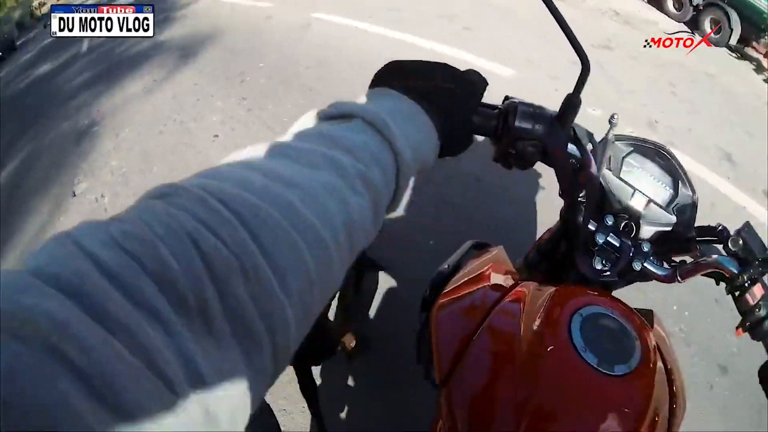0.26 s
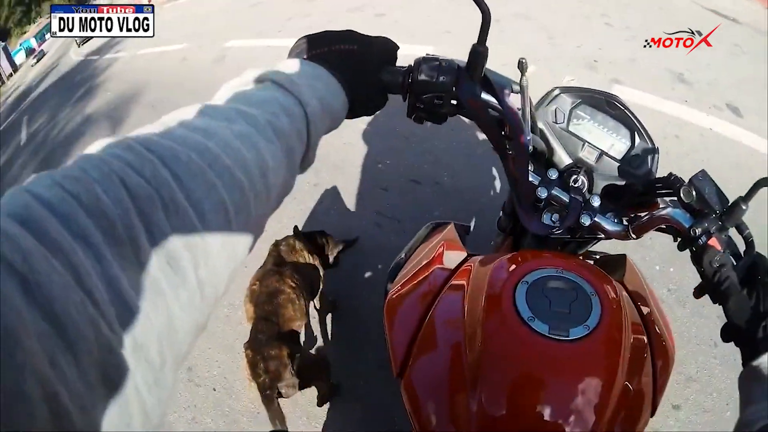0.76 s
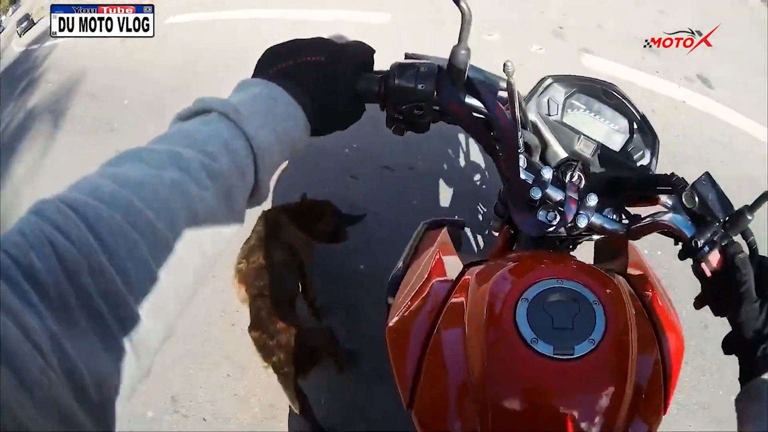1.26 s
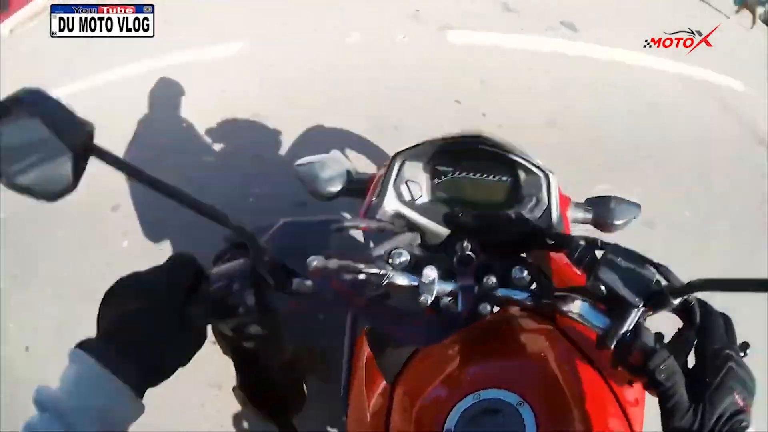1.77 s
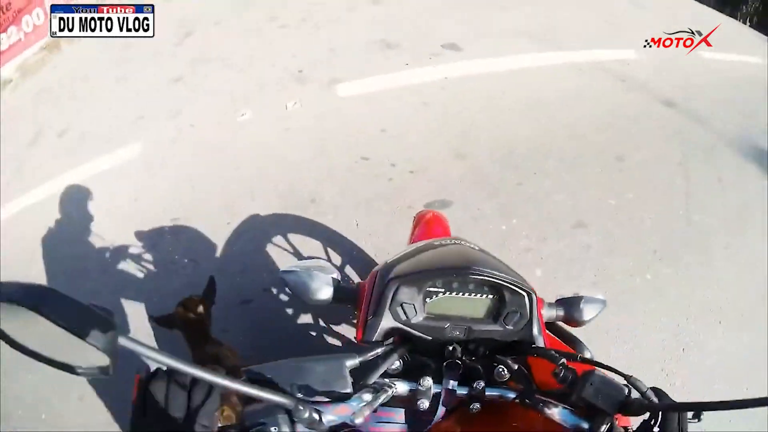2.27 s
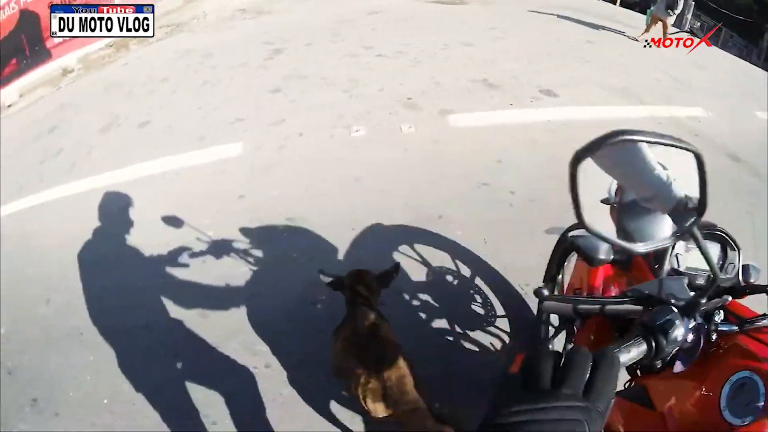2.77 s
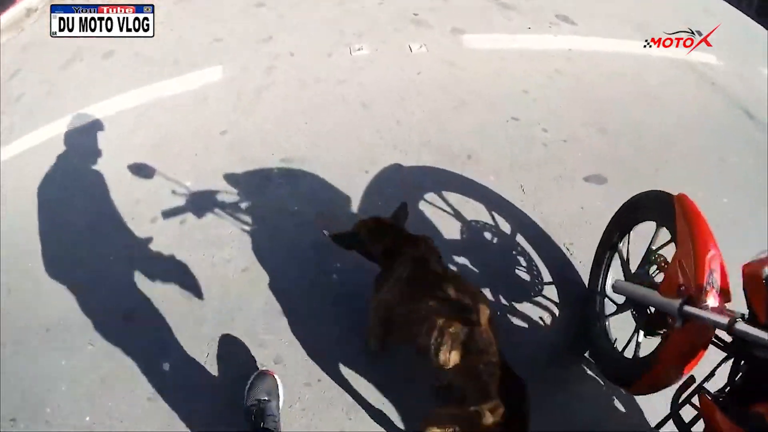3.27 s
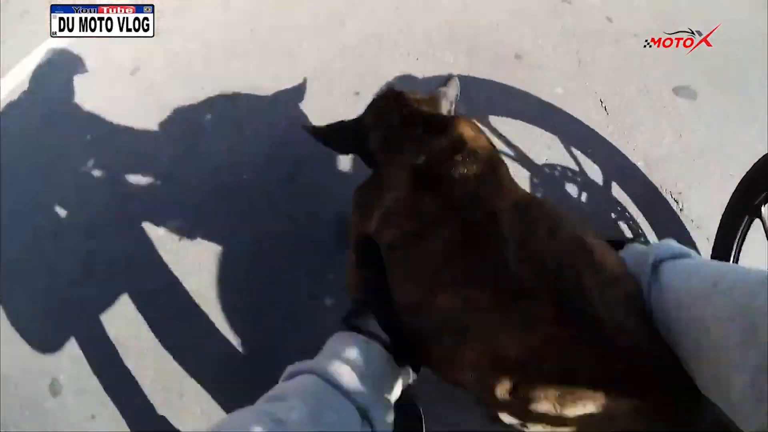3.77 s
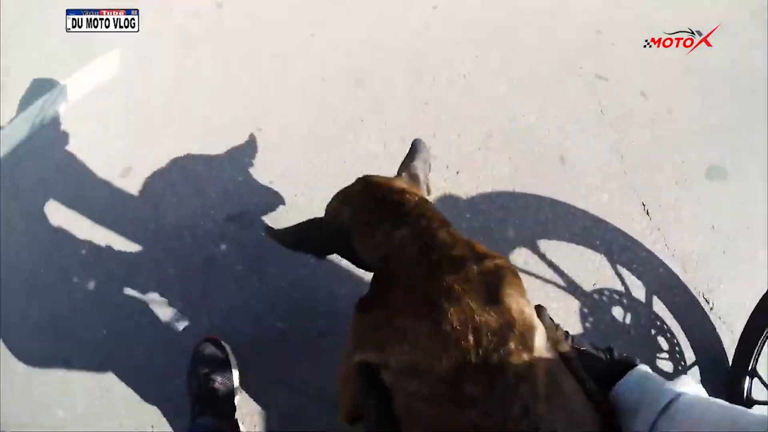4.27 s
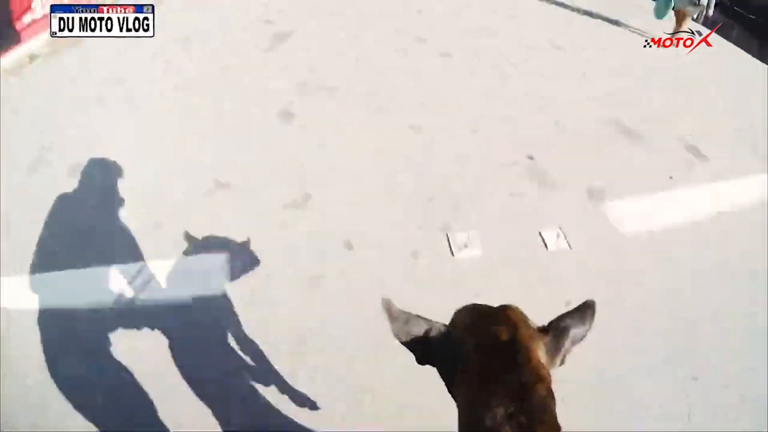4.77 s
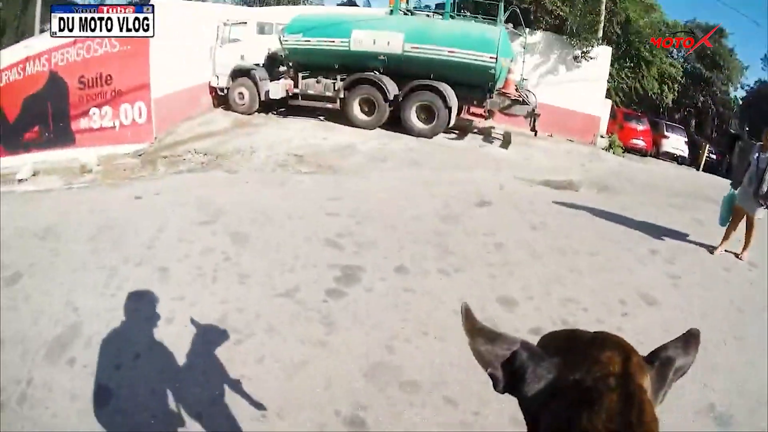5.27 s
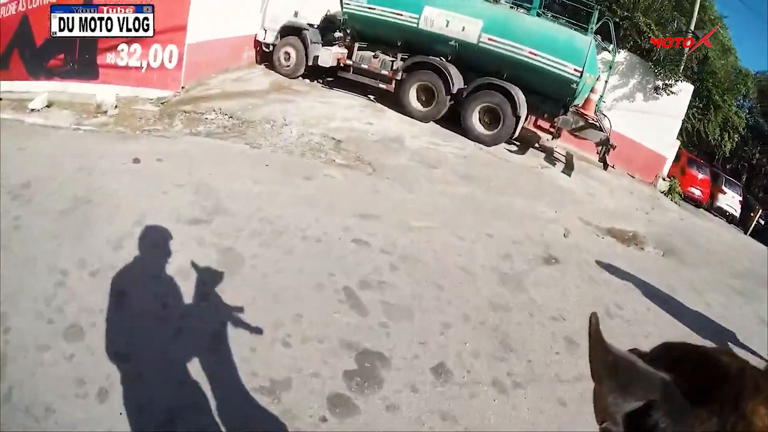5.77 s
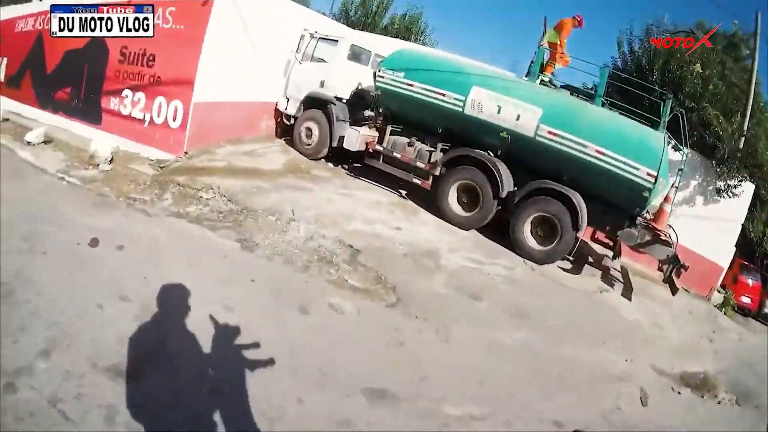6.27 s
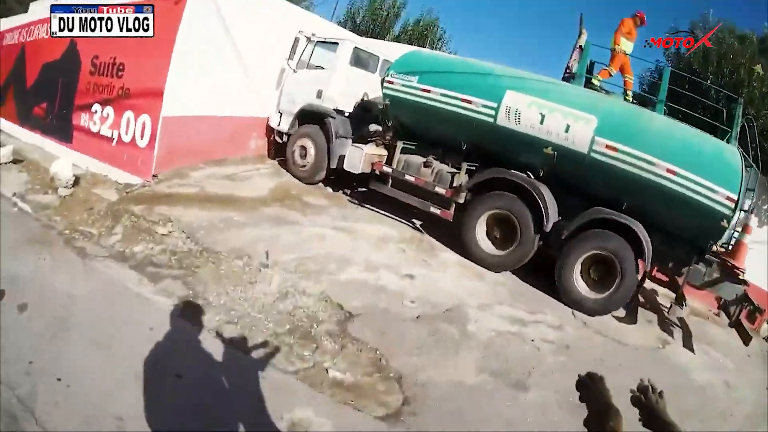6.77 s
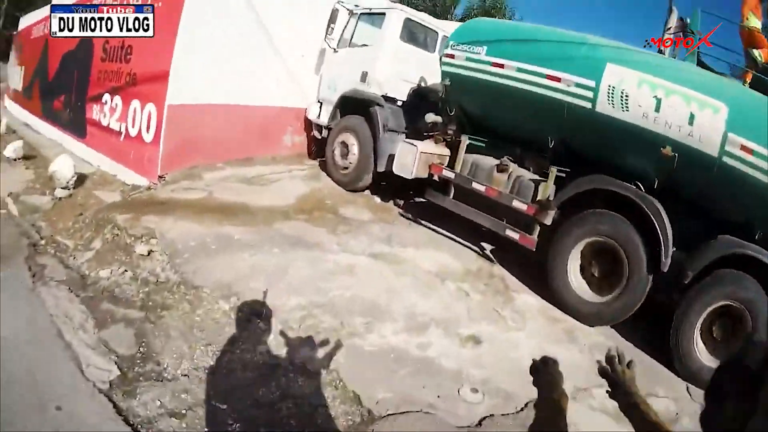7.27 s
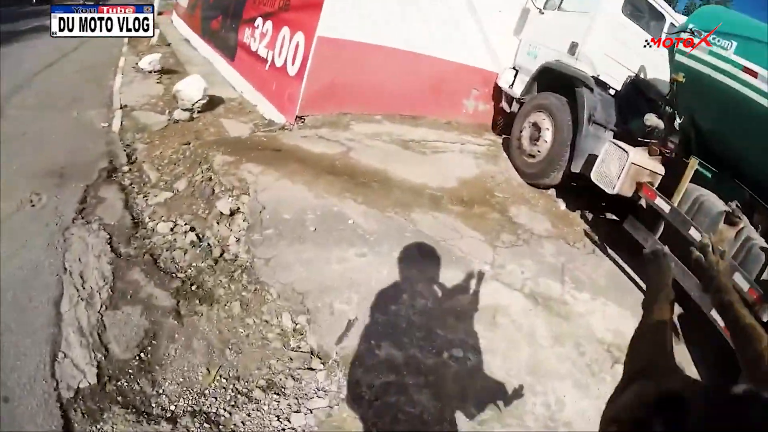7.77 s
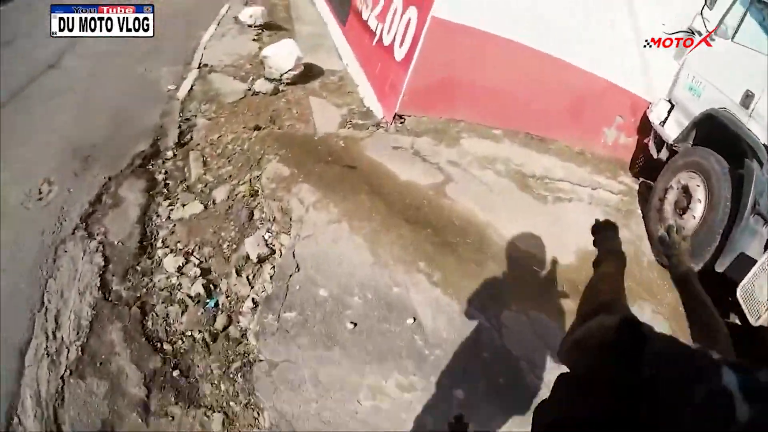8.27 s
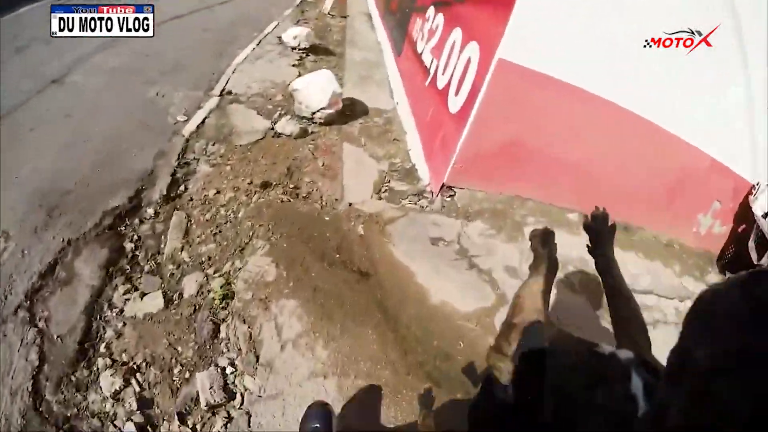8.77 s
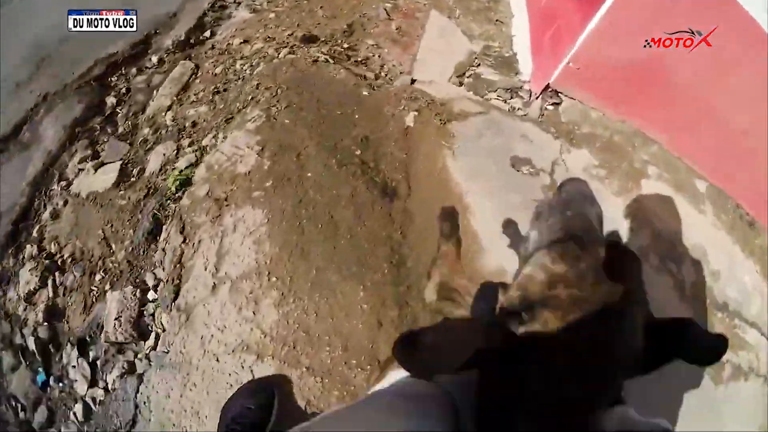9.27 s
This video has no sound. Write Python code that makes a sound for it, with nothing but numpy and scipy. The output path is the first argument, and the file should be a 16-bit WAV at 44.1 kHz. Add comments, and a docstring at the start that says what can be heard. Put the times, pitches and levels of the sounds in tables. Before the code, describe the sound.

A camera in a closed plastic case on a helmet, beside a sunny road. Dull, boxy street noise and thin hiss fade slowly; a brief horn toot echoes early, keys clink, and a scuff passes. Dry plastic ticks and light rustle follow as the rider lifts a dog. From about six seconds, carrying it brings hard thuds, crunching rattle and clipped low jolts, then sparse clicks over a subdued background.

```python
"""Helmet camera beside a road

A camera in a closed plastic case rides on a helmet. The case ticks in its mount and thuds, as damped modes
and noise bursts; steps and bumps jolt it as decaying swings and shake the helmet's resonances. Street noise
and hiss are shaped noise, with a brief scuff and a soft rustle; thin whistles are wavering sines, a horn
toots once in overtones with echoes, and keys clink as noise bursts. Hard jolts make the background sink
and overload the input."""
import sys
import numpy as np
from scipy import signal
from scipy.fft import rfft, irfft, next_fast_len
from scipy.io import wavfile
from scipy.ndimage import uniform_filter1d, map_coordinates

SR = 44100
rng = np.random.default_rng(int(sys.argv[2]) if len(sys.argv) > 2 else 0)


def bounce(signal):
    """Save signal as a 16-bit WAV file at the path given by the first command-line argument."""
    frames = np.transpose(np.atleast_2d(signal))
    limited = np.clip(frames, -1, 1)
    pcm = np.round(limited * 32767).astype(np.int16)
    wavfile.write(sys.argv[1], SR, pcm)


N = 419832


def amp(db):
    """Decibel law: the amplitude ratio of a level in dB."""
    return 10 ** (np.asarray(db) / 20)


def unit(x):
    """Normalisation: x scaled to an rms of 1."""
    return x / np.sqrt(np.mean(x ** 2) + 1e-20)


def along(points, hz):
    """Spectral envelope: (Hz, value) points joined on a logarithmic frequency axis."""
    f, v = np.transpose(points)
    return np.interp(np.log(hz + 1), np.log(f + 1), v)


def wobble(rate):
    """Slow random modulation: a smooth curve through random knots, rate of them a second."""
    knots = rng.standard_normal(int(N * rate / SR) + 4)
    return map_coordinates(knots, [np.arange(N) * rate / SR])


def filtered(x, response):
    """Linear filtering: the spectrum of x times a complex response of frequency."""
    m = next_fast_len(N + SR // 2)
    return irfft(rfft(x, m) * response(np.fft.rfftfreq(m, 1 / SR)), m)[..., :N]


def noise(spectrum, patchy_db=0):
    """Coloured noise: random patches of gain in time and frequency, then a spectral envelope, at rms 1."""
    z = signal.stft(rng.standard_normal(N), nperseg=512)[2]
    field = uniform_filter1d(rng.standard_normal(z.shape), 5, 0)
    field = uniform_filter1d(field, 12, 1)
    x = signal.istft(z * amp(patchy_db * unit(field)), nperseg=512)[1][:N]
    return unit(filtered(x, lambda hz: amp(along(spectrum, hz))))


def bursts(times, dbs, t60, spectrum):
    """Exponential decay: coloured noise jumps up at each time and falls 60 dB in t60 seconds."""
    envelope = np.zeros(N)
    np.add.at(envelope, np.round(times * SR).astype(int), amp(dbs))
    envelope = signal.lfilter([1], [1, -amp(-60 / (t60 * SR))], envelope)
    gain = lambda hz: amp(along(spectrum, hz))
    level_gain = lambda hz: gain(hz) / np.sqrt(np.mean(gain(hz) ** 2))
    return filtered(envelope * rng.standard_normal(N), level_gain)


def peak_db(s, db, rise_s, fall_s, t):
    """Exponential rise and decay: a level climbs 20 dB in rise_s to its peak and drops 20 dB in fall_s."""
    return db - 20 * np.where(t < s, (s - t) / rise_s, (t - s) / fall_s)


# Spectrum of the street noise inside the case. Each row: frequency in Hz, relative density in dB per Hz.
STREET_SPECTRUM = [(200, -27), (260, -5), (450, -5), (800, -6.5), (1150, -3.5), (1350, 3), (1520, -8),
                   (1750, -11), (2200, -12.5), (2400, -6), (2650, -12.5), (3200, -17.5), (3720, -12.5),
                   (4500, -22.5), (7000, -61.5)]
# Spectrum of the input hiss. Each row: frequency in Hz, relative density in dB per Hz.
HISS_SPECTRUM = [(3000, -20), (4700, 0), (7500, -3), (12000, 1), (15400, -1)]
# Thin whistles. Each row: start in seconds, end in seconds, mean frequency in Hz,
# mean amplitude in dB against the hiss rms.
WHISTLES = [(0, .55, 11750, -9), (4.05, 4.55, 13400, -9), (5.55, 5.95, 13400, -4), (0, 9.52, 12230, -13)]
# Swells of the background: a high start that falls away, a brief scuff, a soft rustle.
# Each row: peak time in seconds, rise in seconds, fall in seconds, street gain in dB, hiss gain in dB.
SWELLS = [(0, .1, 7.6, 3, 2), (1.928, 0.015, 0.11, 8, 1), (3.7, 0.18, 0.43, 4, 4)]
STREET_DB, HISS_DB = -48.5, -58.5  # rms levels at ease
HISS_TOP_HZ = 15350
# a jolt's level above SINK_FROM_DB, times SINK_PER_DB, is the drop of the street in dB
SINK_FROM_DB, SINK_PER_DB, SINK_BACK_DB_PER_S = -24, 0.4, 19
HISS_SINKS = 1.3  # drop of the hiss over drop of the street


def background():
    """Amplitude modulation: street noise and hiss swell, and sink after jolts; whistles waver."""
    t = np.arange(N) / SR
    sinks_db = []
    for s, db, *_ in JOLTS:
        drop_db = SINK_PER_DB * (db - SINK_FROM_DB) - SINK_BACK_DB_PER_S * (t - s)
        sinks_db.append(np.clip(drop_db, 0, None) * (t > s))
    sink_db = np.max(sinks_db, axis=0)
    street_db = STREET_DB - sink_db
    hiss_db = HISS_DB - HISS_SINKS * sink_db
    for s, rise_s, fall_s, street_up_db, hiss_up_db in SWELLS:
        hump = np.interp(t, [s - rise_s, s, s + fall_s], [0, 1, 0])
        street_db = street_db + street_up_db * hump
        hiss_db = hiss_db + hiss_up_db * hump
    street = amp(street_db + 1.25 * wobble(1.404)) * noise(STREET_SPECTRUM, patchy_db=1.6)
    hiss = filtered(noise(HISS_SPECTRUM, patchy_db=.5), lambda hz: hz < HISS_TOP_HZ)
    for start, end, hz, db in WHISTLES:
        fade = np.clip(np.minimum(t - start, end - t) / .15, 0, 1)
        level = amp(db + 3 * wobble(30))
        phase = 2 * np.pi * np.cumsum(hz + 25 * wobble(90)) / SR
        hiss += fade * level * np.sin(phase)
    return street + amp(hiss_db) * hiss


# Steps and head moves. Each row: peak time in seconds, sway level in dB, shell level in dB,
# time to fade 20 dB in seconds before the sway and shell shares scale it.
MOVES = [(1.1, -39, -42, .5), (2.762, -32.5, -50, 0.5), (3.39, -43, -43, 3), (3.54, -39, -31, 0.37),
         (3.93, -29.5, -30, 0.6), (4.1, -37, -42, 1), (4.67, -38, -40, 0.5), (5.37, -35.5, -34.5, 1),
         (5.747, -31.5, -22.5, 0.13), (5.97, -45, -36.5, 0.8), (6.06, -31, -26, 0.22),
         (6.11, -16.5, -13, 0.19), (6.332, -23, -9, 0.13), (6.418, -11, -6, 0.12), (6.5, -23, -40, 0.16),
         (6.58, -26, -27, 0.34), (6.649, -16.5, -10.5, 0.17), (6.698, -15, -7, 0.03),
         (6.871, -34, -16, 0.2576), (6.957, -16.5, -11.5, 0.15), (7.17, -36, -29.5, 0.7),
         (7.231, -10.5, -5.5, 0.1242), (7.39, -45, -36.5, 0.5), (7.541, -24, -13, 0.2346),
         (7.598, -37, -28, 0.14), (7.87, -37, -38, 1), (8.186, -27.5, -31, 0.44), (8.635, -26, -20.5, 0.29),
         (9.03, -30, -30.5, 0.3262), (9.45, -39.5, -41.5, 2)]
RISE_SHARE = 0.47  # rise time over fade time
SWAY_SHARE, SHELL_SHARE = 0.84, 0.61  # factors on the fade time
SWAY_DB, SHELL_DB = -49.5, -47.5  # rms levels on a still head


def effort_db(rest_db, peaks_db, share):
    """Maximum principle: the strongest move at each moment sets the level, never below the level at rest."""
    t = np.arange(0, N / SR, .002)
    levels = [peak_db(s, db, RISE_SHARE * share * fade_s, share * fade_s, t)
              for (s, *_, fade_s), db in zip(MOVES, peaks_db)]
    strongest = np.maximum(np.max(levels, axis=0), rest_db)
    return np.interp(np.arange(N) / SR, t, strongest)


# Spectrum of the slow sway. Each row: frequency in Hz, relative density in dB per Hz.
SWAY_SPECTRUM = [(12, -34), (25, 3.5), (42, -3), (75, -3.5), (100, -22), (140, -120)]
# Low resonances of the helmet. Each row: centre in Hz, width in Hz, relative gain in dB.
HELMET_MODES = [(98.5, 19.3, 2), (122, 71.8, -3.5), (215.7, 16.8, -1.5), (238, 22, -4)]
# Spectrum of the crunch, and of the grit of ticks. Each row: frequency in Hz, relative density in dB per Hz.
GRIT_SPECTRUM = [(250, -20), (400, 0), (1300, 0), (2000, -6), (3800, -3), (4400, -20), (12000, -45)]


def shaking():
    """Forced resonance: noise drives the helmet's low modes, with slow sway and a crunch of tiny slips."""
    _, sway_peaks_db, shell_peaks_db, _ = np.transpose(MOVES)
    sway_db = effort_db(SWAY_DB, sway_peaks_db, SWAY_SHARE)
    shell_db = effort_db(SHELL_DB, shell_peaks_db, SHELL_SHARE)

    def shell_response(f):
        modes = sum(amp(db) * 1j * f * width / (centre ** 2 - f * f + 1j * f * width)
                    for centre, width, db in HELMET_MODES)
        return modes / (1 + (f / 300) ** 6)

    drive = rng.standard_normal(N) * amp(3 * wobble(25))
    shell = unit(filtered(drive, shell_response))
    slips = rng.random((int(150 * N / SR), 2))  # 150 slips a second, at random times and sizes
    slip_times = slips[:, 0] * (N - 1) / SR
    sizes_db = -5 * np.log(slips[:, 1] + .02)
    crunch = unit(bursts(slip_times, sizes_db, t60=.008, spectrum=GRIT_SPECTRUM))
    # the slips grow faster than the shaking that causes them
    crunch_db = 1.3 * shell_db - 18
    return amp(sway_db) * noise(SWAY_SPECTRUM) + amp(shell_db) * shell + amp(crunch_db) * crunch


# Ticks of the mount and dull thuds. Each row: time in seconds before TICK_SHIFT_S is added,
# level in dB before the part gains, dull knock in dB against that level, bright crack in dB against that level.
TICKS = [(0.5631, -10.5, -33.5, -42), (0.894, -11, -45, -37.5), (1.0469, -17, -16, -33),
         (1.0887, -16, -15.5, -28.5), (2.2219, -9.5, -23, -34), (2.5736, -34, -3, -30),
         (3.384, -17, -13, -25.5), (3.5015, -24, -4, -27), (3.5277, -27, -2.5, -25.5),
         (3.541, -27, -11, -13), (3.5576, -12.5, -31, -38), (3.647, -37, -33.5, -3),
         (3.8643, -18, -34, -28.5), (4.2166, -26, -10, -37), (4.5122, -23.5, -11.5, -32),
         (4.6365, -33, -16.5, -27), (5.213, -17, -14.5, -22.5), (5.3184, -9, -33.5, -38.5),
         (5.3507, -30.5, -14, -23), (5.372, -10, -26, -41), (5.5024, -16, -24, -27.5),
         (5.6195, -27.5, -12.5, -34), (5.719, -43, 22, -23.5), (5.7356, -43, 20.5, -25.5),
         (5.747, -41.5, 14, -21), (5.966, -20, -18, -22), (6.058, -36, 11.5, -30), (6.069, -16, -5.5, -25),
         (6.1, -0.5, -29, -33.5), (6.1158, -15.5, 3.5, -20), (6.124, -11, -3, -24.5),
         (6.2656, -3, -24, -33), (6.304, -15, -9, -22), (6.328, -5.5, -11.5, -23.5),
         (6.332, -9.5, -19, -15.5), (6.355, -14.5, -7, -24), (6.3618, -3, -10.5, -20.5),
         (6.381, -23, 10.5, -10), (6.4079, 4, -5.5, -21.5), (6.423, -13, -1, -10), (6.432, -19, -1, -24),
         (6.4687, -31.5, 10, -33), (6.5313, -28.5, -2.5, -43), (6.571, -20, 0.5, -12.5),
         (6.583, -24, -7, -32), (6.5975, -22.5, 8, -29), (6.6407, -11.5, 6, -11.5), (6.6477, -14, 4.5, -13),
         (6.654, -20, 0, -14), (6.673, -4.5, -5, -22.5), (6.6788, 7.5, -9, -25.5),
         (6.6978, -5.5, -0.5, -17.5), (6.7265, -13.5, -13, -38), (6.739, -21.5, -12, -26),
         (6.807, -15, -21, -37), (6.8303, -23, -5, -33.5), (6.8543, -3.5, -10.5, -36),
         (6.8918, -17, -29, -37), (6.9001, -16.5, -5, -21), (6.9174, -18, 0, -39),
         (6.9436, -6.5, -1.5, -37), (6.952, -16.5, -4, -25), (6.9647, -23.5, 7.5, -38),
         (7.008, -33, 10, -35), (7.1469, -23.5, -7, -37), (7.17, -32, 3, -35), (7.18, -26, 0, -31.5),
         (7.1874, -11, -9, -18.5), (7.2154, -10.5, -6, -25.5), (7.22, 9, -11.5, -12.5),
         (7.227, -5, -6.5, -14), (7.238, -1.5, -6.5, -31), (7.265, -9.5, -27, -35), (7.282, -20, -7, -20),
         (7.3131, -13, -40.5, -28.5), (7.3503, -28.5, -6.5, -32), (7.375, -16.5, -15, -59.5),
         (7.4519, -38.5, 8.5, -30), (7.4794, -11, -22, -32.5), (7.4951, -14, -10.5, -18.5),
         (7.5252, -12, -27.5, -32), (7.5319, -3.5, -18, -24), (7.5432, -10.5, -1, -15),
         (7.55, -17.5, 1.5, -29), (7.5736, -19.5, -19.5, -33), (7.581, -22.5, -7.5, -17.5),
         (7.595, -29.5, 3.5, -32), (7.633, -42.5, 11.5, -34), (7.8292, -6.5, -34.5, -31),
         (8.0333, -5, -35, -30.5), (8.1697, -24, 5.5, -26), (8.1989, -9, -21.5, -31), (8.364, -7, -40, -33),
         (8.5866, -44.5, 15.5, -10), (8.6208, 0, -19, -33), (8.64, -18, -2, -22), (8.6732, -4.5, -33, -32),
         (8.7891, -3.5, -42.5, -32.5), (9.018, -23, -8, -35.5), (9.0321, -38.5, 12, -14),
         (9.066, -37, 10, -10), (9.1235, -16, -13.5, -32.5), (9.264, -11, -17.5, -28.5),
         (9.3483, -8, -34, -31), (9.386, -8.5, -35, -38)]
# Modes of the case before each tick scatters them. Each row: frequency in Hz, level in dB, t60 in seconds.
CASE_MODES = [(840.4, -21.5, 0.033), (1390, -21, 0.061), (1989, -1, 0.022), (2411, -10, 0.03),
              (2810, -2, 0.0075), (3400, -3, 0.0091), (3677, 2, 0.019)]
# Spectrum of the dull knock. Each row: frequency in Hz, relative density in dB per Hz.
KNOCK_SPECTRUM = [(150, 0.5), (260, 6), (650, -1.5), (1300, -2.5), (1800, -38), (3000, -90)]
# Spectrum of the bright crack. Each row: frequency in Hz, relative density in dB per Hz.
CRACK_SPECTRUM = [(3500, 7), (4800, 2.5), (8000, -7), (12000, -7), (15500, -26), (17000, -67)]
MODE_DB, KNOCK_DB, CRACK_DB = -5, 0, 3  # gains of the parts of a tick
TICK_SHIFT_S = .0007  # shift of the whole tick
TAIL_HZ, TAIL_DB, TAIL_T60 = 3420, -26, .075  # one thin tone outlasts the rest; level before MODE_DB
DAMP_S = 0.011  # the mount seats again and chokes the modes: 20 dB more lost by then
GRIT_DB, GRIT_T60 = -11, 0.036  # a held tick drags grit after it


def ticks():
    """Modal synthesis: each tick rings the case's damped modes, a dull knock under it, a short crack on top."""
    s, db, knock_db, crack_db = np.transpose(TICKS)
    s = s + TICK_SHIFT_S
    out, t = np.zeros(N + SR), np.arange(SR // 12) / SR
    # a tick with a strong knock is held by the padding: uneven modes, shorter ring
    held = np.clip((knock_db + 24) / 20, 0, 1)
    spread = rng.standard_normal((len(s), 2, len(CASE_MODES), 1))
    hz, mode_db, t60 = np.transpose(CASE_MODES)[:, :, None]
    tail = amp(TAIL_DB - 60 * t / TAIL_T60) * np.sin(2 * np.pi * TAIL_HZ * t)
    for k in range(len(s)):
        start_db = mode_db + 5 * held[k] * np.log2(hz / 3000) + (1.6 + 4.5 * held[k]) * spread[k, 0]
        decay_db = 60 * t / (t60 * (1 - .6 * held[k])) + 20 * (t / DAMP_S) ** 3
        pitch = hz * (1 + (.008 + .05 * held[k]) * spread[k, 1])
        modes = np.sum(amp(start_db - decay_db) * np.sin(2 * np.pi * pitch * t), axis=0)
        modes = modes * (1 - np.exp(-t / .0001))
        out[round(s[k] * SR):][:len(t)] += amp(db[k] + MODE_DB) * (modes + (1 - held[k]) * tail)
    band = signal.cheby2(6, 45, [250, 4700], "bandpass", fs=SR, output="sos")
    ring = signal.sosfilt(band, out[:N])
    grit = bursts(s, db + GRIT_DB - 20 * (1 - held), t60=GRIT_T60, spectrum=GRIT_SPECTRUM)
    knock = bursts(s, db + knock_db + KNOCK_DB, t60=0.035, spectrum=KNOCK_SPECTRUM)
    crack = bursts(s, db + crack_db + CRACK_DB, t60=0.014, spectrum=CRACK_SPECTRUM)
    return ring + grit + knock + crack


# Harmonics of the horn from the fundamental up. Each entry: relative level in dB.
HORN_HARMONICS = [-4, -4.5, 1.5, -11, -7, -6, -9.5, -9, -16.5, -18.5, -18, -24]
# Wall echoes of the horn. Each row: delay in seconds, level in dB at the centre of the echo band.
WALL_ECHOES = [(.07, -1), (0.101, -11), (.135, -11), (.165, -12), (0.193, -16)]
TOOT_S, TOOT_DB = 0.651, -29  # time and rms level of the peak
TOOT_RISE_DB_PER_S, TOOT_FALL_DB_PER_S = 950, 706


def horn(pitch_hz=421):
    """Harmonic series and reflection: a brief buzz of overtones; walls send back mostly its piercing middle."""
    turns = np.cumsum(pitch_hz * (1 + .004 * wobble(120))) / SR
    t = np.arange(N) / SR
    level_db = peak_db(TOOT_S, TOOT_DB, 20 / TOOT_RISE_DB_PER_S, 20 / TOOT_FALL_DB_PER_S, t)
    # k * k staggers the phases of the harmonics
    buzz = sum(amp(db) * np.sin(2 * np.pi * k * turns + k * k)
               for k, db in enumerate(HORN_HARMONICS, start=1))
    toot = amp(level_db) * unit(buzz)

    def echo_response(f):
        delays = sum(amp(db) * np.exp(-2j * np.pi * f * delay_s) for delay_s, db in WALL_ECHOES)
        return delays / (1 + ((f - 2520) / 250) ** 2)

    return toot + filtered(toot, echo_response)


# Clinks of keys. Each row: time in seconds, starting level in dB.
CLINKS = [(1.029, -39.5), (1.203, -32.5), (1.9207, -34.5)]


def keys():
    """Impulsive excitation: short bright clinks as decaying bursts of treble noise."""
    s, db = np.transpose(CLINKS)
    spectrum = [(1800, -33), (2400, -15.5), (5000, -25), (15500, -26), (17000, -35)]  # (Hz, dB per Hz)
    return bursts(s, db, t60=0.026, spectrum=spectrum)


# Jolts of steps and bumps. Each row: time in seconds, level in dB before onset and decay shape it,
# swing frequency in Hz once it has slowed, t60 in seconds.
JOLTS = [(2.7564, -12.5, 48, 0.11), (6.107, -17, 97.5, 0.043), (6.3187, -0.5, 82, 0.2),
         (6.4089, 10, 103, 0.083), (6.666, 1.5, 41.96, 0.17), (6.68, 6.5, 93.3, 0.157),
         (6.6931, 12.5, 86.1, 0.075), (6.7152, 0, 27.6, 0.106), (6.8632, -2, 84.7, 0.088),
         (6.9434, 3.5, 97.1, 0.149), (7.1906, 1, 41.4, 0.42), (7.2285, 12.5, 63.1, .089),
         (7.4949, -0.5, 39.3, 0.17), (7.529, 2.5, 77.1, 0.085), (7.5423, -1.5, 95, 0.079),
         (8.179, -23.5, 34.2, 0.56), (8.5941, -15.5, 41.7, 0.3)]


def jolts():
    """Damped oscillation: each bump swings the helmet for a few cycles, the swing slowing as it fades."""
    out, t = np.zeros(N + SR), np.arange(SR // 2) / SR
    onset = 1 - np.exp(-t / 0.0035)
    for s, db, hz, t60 in JOLTS:
        phase = 2 * np.pi * hz * (t + 0.00434 * (1 - np.exp(-t / 0.0063)))
        swing = amp(db - 60 * t / t60) * onset * np.sin(phase)
        out[round(s * SR):][:len(t)] += swing
    return out[:N]


def scene():
    """Superposition: the sources add linearly into one channel."""
    return (background() + shaking() + ticks() + horn() + keys() + jolts())[None]


TOP_HZ = 16500  # upper limit of the recorded sound


def record(dry):
    """Saturation and band limiting: the input overloads with flat tops, then nothing above TOP_HZ is kept."""
    hard, top = 40, .997  # sharpness of the knee, ceiling in full scale
    clipped = dry / (1 + np.abs(dry / top) ** hard) ** (1 / hard)
    return filtered(clipped, lambda hz: np.clip((TOP_HZ - hz) / 60, 0, 1))


dry = scene()
out = record(dry)
bounce(out)
```